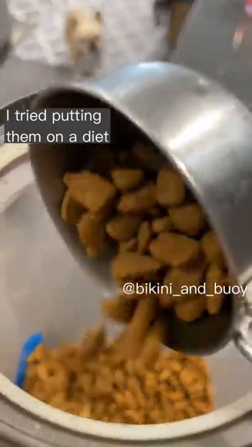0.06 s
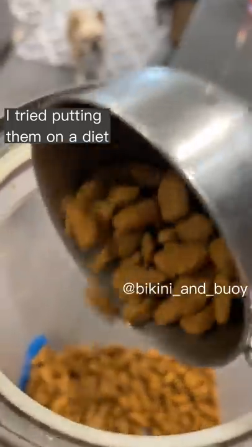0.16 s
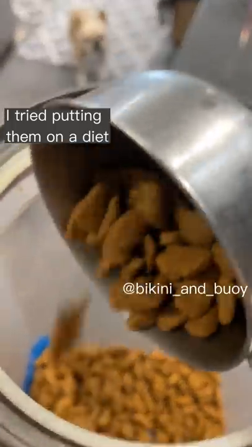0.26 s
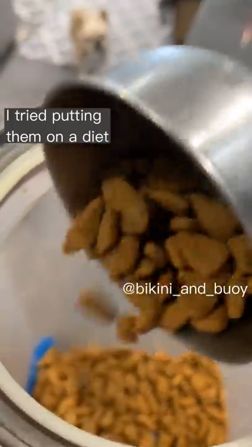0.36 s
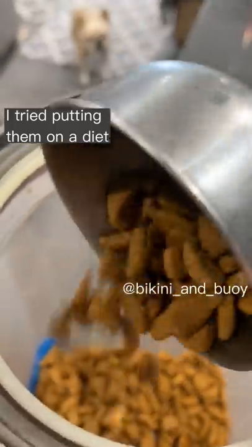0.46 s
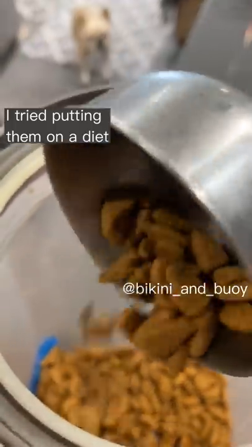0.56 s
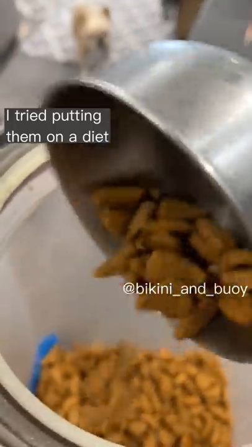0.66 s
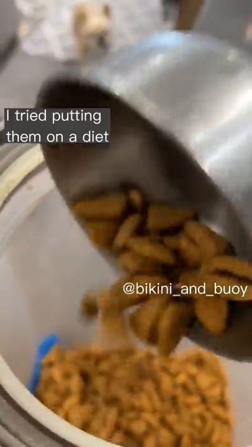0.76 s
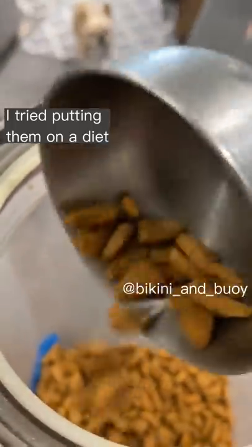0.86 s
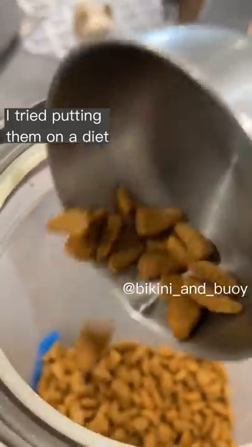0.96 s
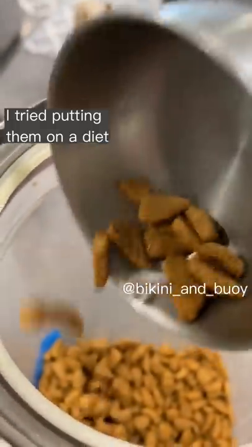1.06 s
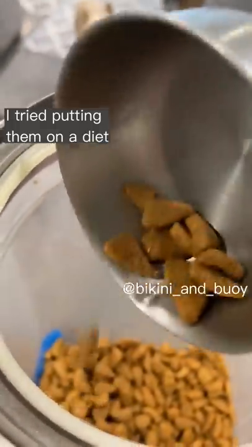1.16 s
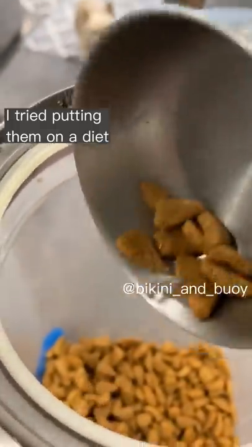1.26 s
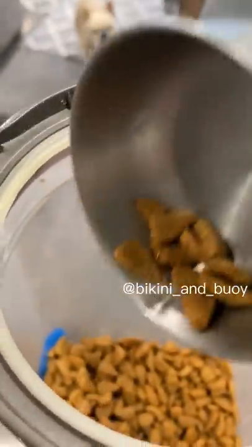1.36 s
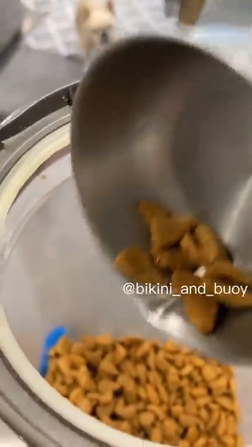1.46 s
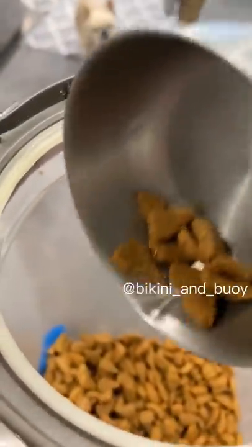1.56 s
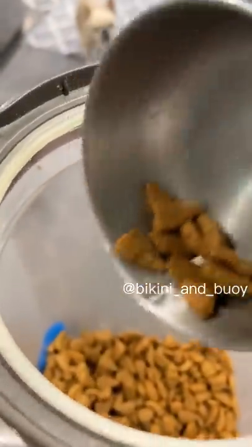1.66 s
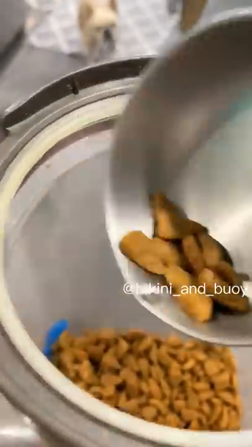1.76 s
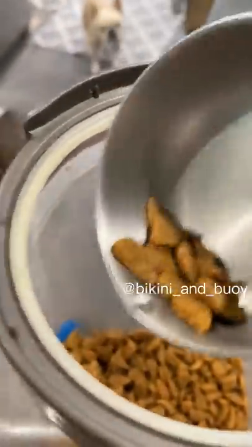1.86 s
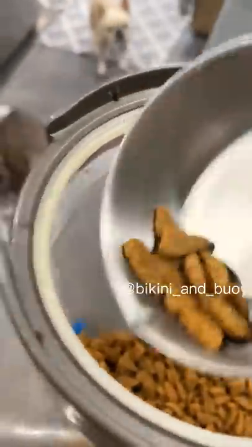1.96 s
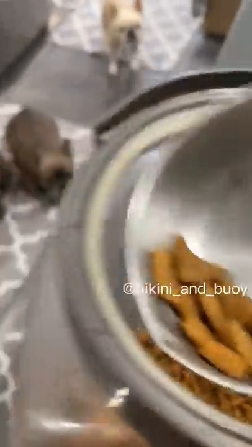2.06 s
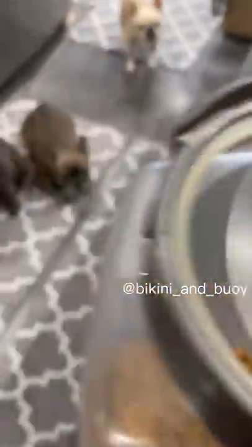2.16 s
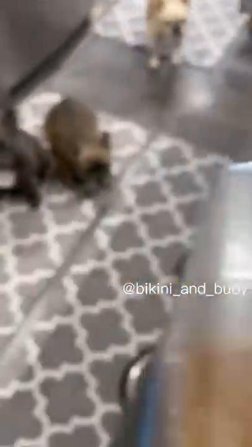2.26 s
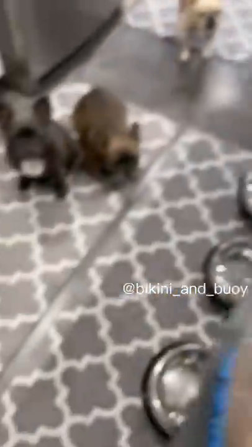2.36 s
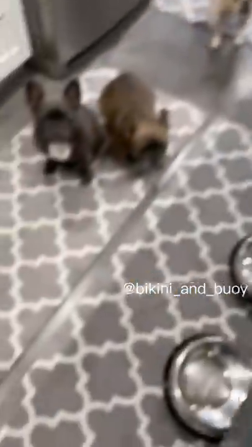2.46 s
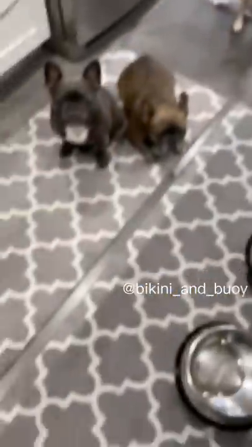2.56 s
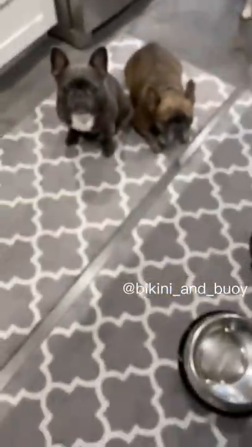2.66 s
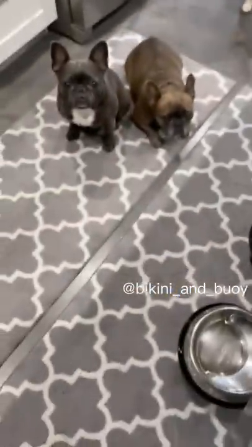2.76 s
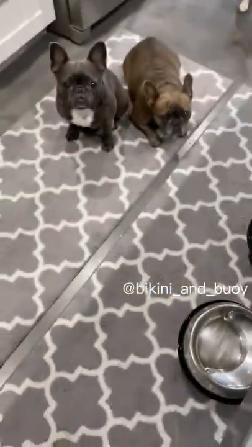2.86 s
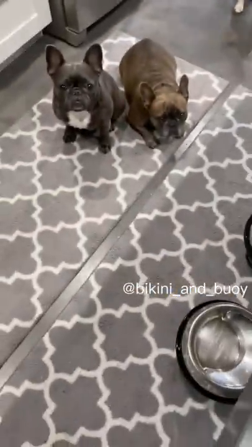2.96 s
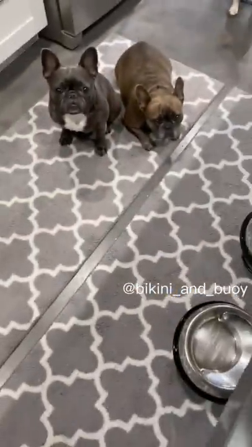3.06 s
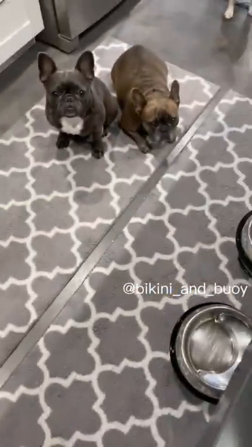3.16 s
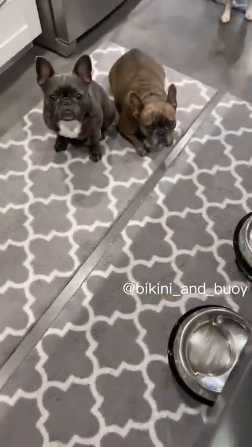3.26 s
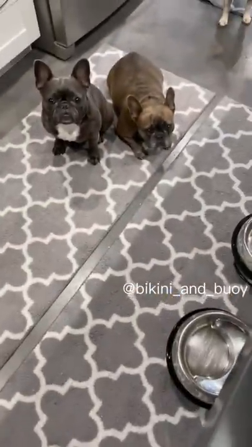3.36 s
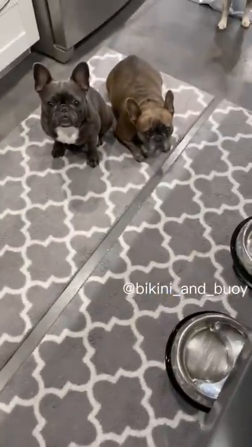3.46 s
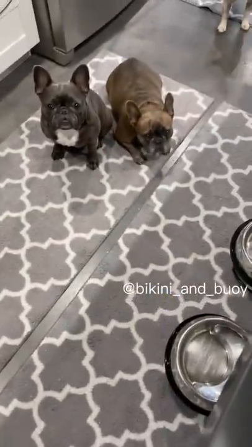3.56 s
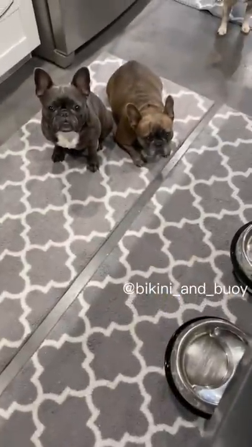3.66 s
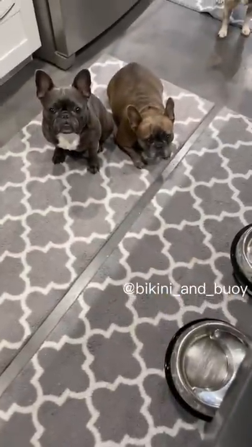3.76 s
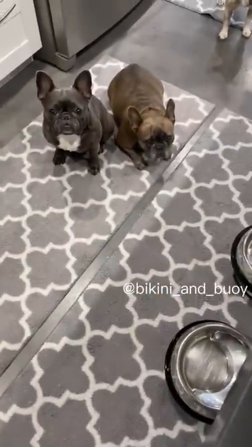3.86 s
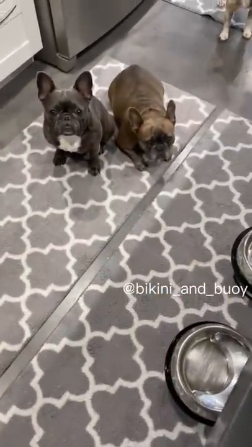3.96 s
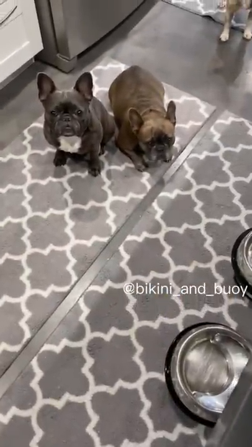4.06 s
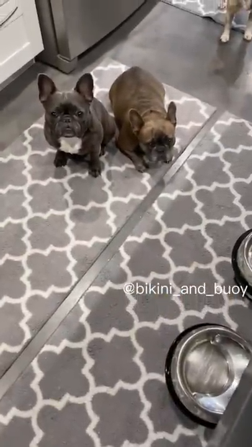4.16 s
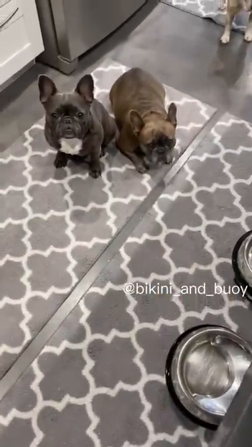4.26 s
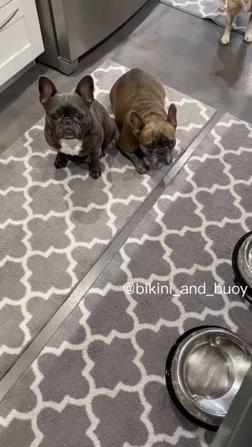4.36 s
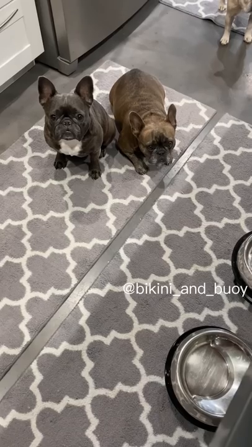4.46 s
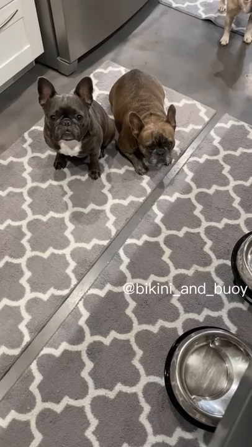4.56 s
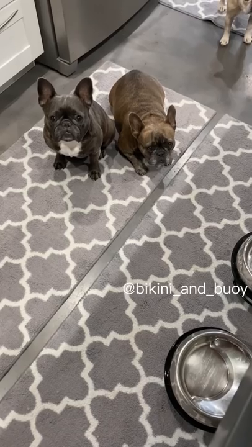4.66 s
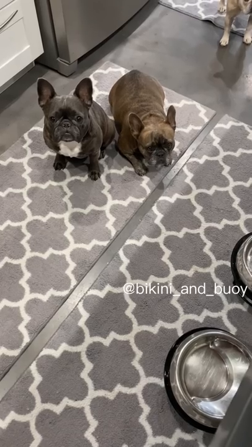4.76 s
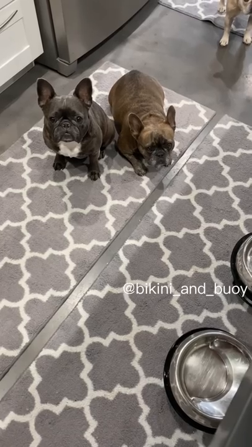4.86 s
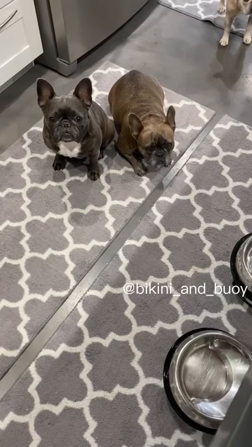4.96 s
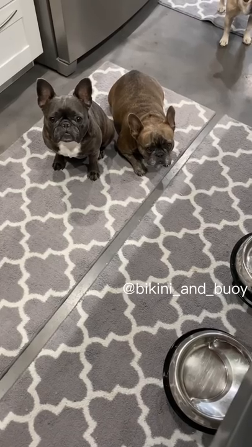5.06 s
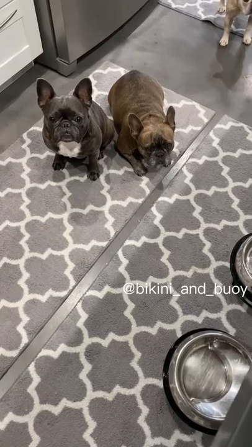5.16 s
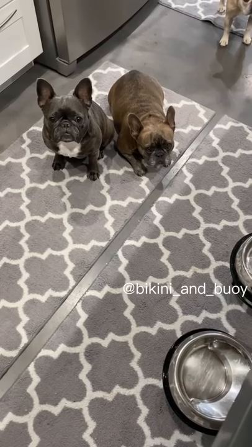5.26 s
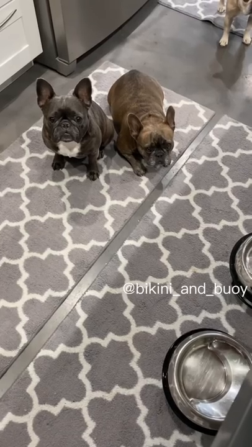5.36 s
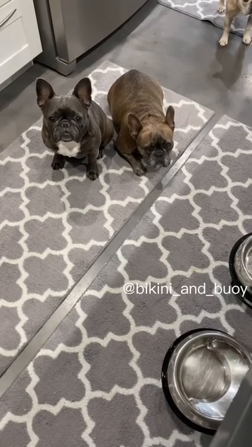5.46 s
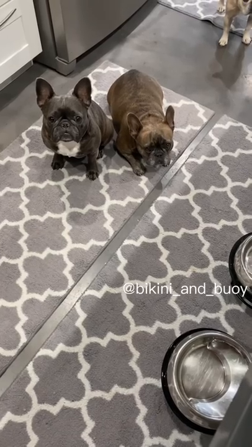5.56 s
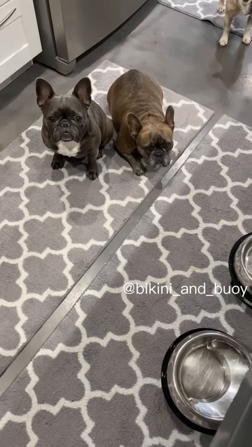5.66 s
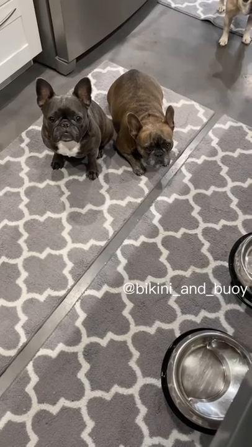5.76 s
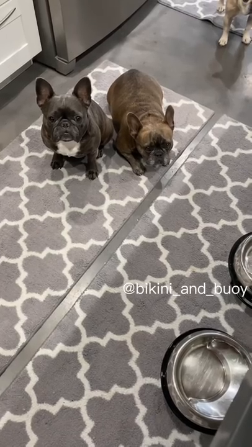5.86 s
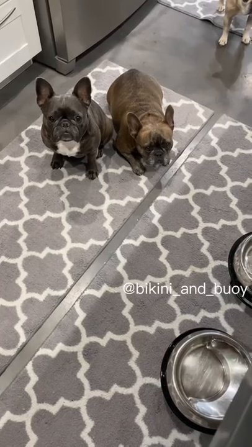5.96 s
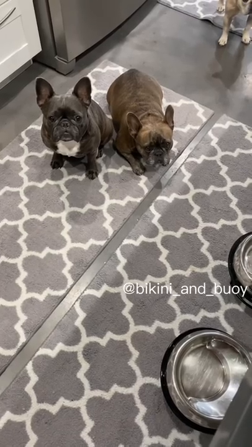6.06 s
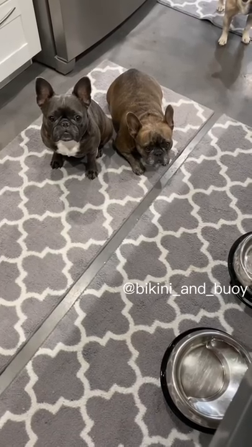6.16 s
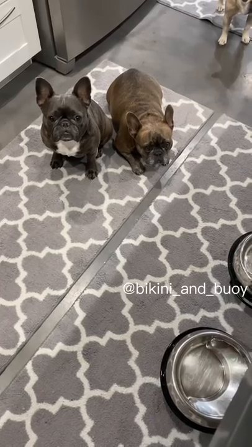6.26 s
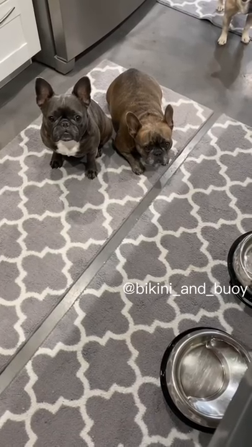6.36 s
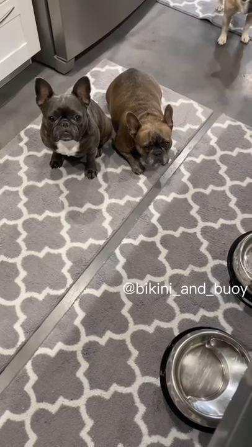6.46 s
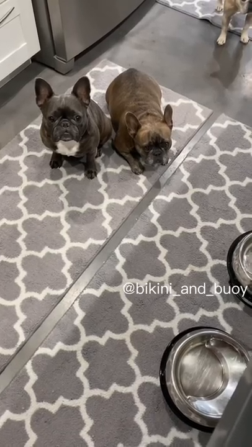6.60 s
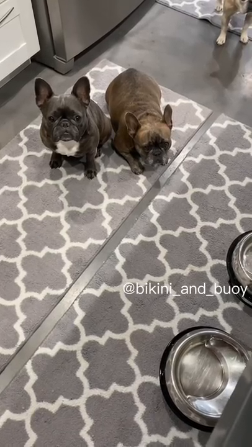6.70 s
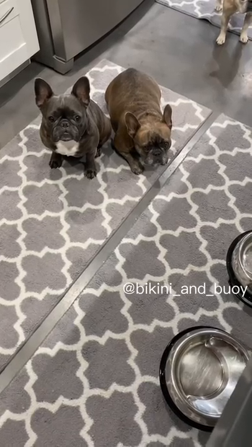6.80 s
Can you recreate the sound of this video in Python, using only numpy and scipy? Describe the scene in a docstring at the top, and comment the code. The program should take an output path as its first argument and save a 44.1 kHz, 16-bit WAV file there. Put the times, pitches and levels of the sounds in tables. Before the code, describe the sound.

A close, dense rattle of pet food lands on a pile in a hollow bin, then thin scoop ringing, a click and late thuds.

```python
"""Big dry kibble tips from a steel scoop into a deep storage bin, heard close by in a kitchen.
Each landing is an impact: noise grains crunch on the pile and decaying modes of air, floor and walls boom.
Pieces left in the scoop slide and jolt, and this friction noise drives the modes of its thin steel.
A lone click and, later, dull knocks on the bin follow; fine crumbs trickle during the pour.
A filtered-noise room tail answers these sounds, over a quiet hum with a smooth hiss."""
import sys
import numpy as np
from scipy import signal
from scipy.fft import rfft, irfft, next_fast_len
from scipy.io import wavfile
from scipy.ndimage import uniform_filter1d

SR = 44100
rng = np.random.default_rng(int(sys.argv[2]) if len(sys.argv) > 2 else 0)


def materialize(psi):
    """Save the field psi as 16-bit PCM at rate SR to the path in sys.argv[1].

    A 1-D psi becomes a single channel; in a 2-D psi each row is a channel.
    """
    bounded = np.clip(np.atleast_2d(psi).T, -1, 1)
    quanta = np.round(bounded * 32767).astype(np.int16)
    wavfile.write(sys.argv[1], SR, quanta)


N = 301203


def undb(db):
    """Logarithmic levels: the amplitude gain of a dB value."""
    return 10 ** (np.asarray(db) / 20)


def unit(x):
    """Normalisation: scale a signal to an rms of 1."""
    return x / np.sqrt(np.mean(x ** 2))


def filtered(x, order, hz, kind="low"):
    """Linear filtering: a Butterworth low-pass, high-pass or band-pass."""
    return signal.sosfilt(signal.butter(order, hz, kind, fs=SR, output="sos"), x)


def held(count, spread_db):
    """Random modulation: normally scattered dB gains, each held for count samples."""
    steps = rng.standard_normal(N // count + 1)
    return undb(spread_db * np.repeat(steps, count)[:N])


def curve(table, column):
    """Linear interpolation: a table column joined up in time."""
    points = np.array(table)
    return np.interp(np.arange(N) / SR, points[:, 0], points[:, column])


def colour(x, spectrum):
    """Spectral shaping: weight x by (frequency [Hz], level [dB]) points joined on a log axis."""
    hz, db = np.transpose(spectrum)
    size = next_fast_len(len(x))
    f = np.maximum(np.fft.rfftfreq(size, 1 / SR), 1)
    gain = undb(np.interp(np.log(f), np.log(hz), db))
    return irfft(rfft(x, size) * gain, size)[:len(x)]


def ring(x, hz, t60):
    """Forced resonance: one exponentially decaying mode driven by x."""
    pole = np.exp(2j * np.pi * hz / SR - np.log(1000) / (t60 * SR))
    return signal.lfilter([1], [1, -pole], x).imag


def spikes(s, size):
    """Impulsive excitation: single-sample pushes of given sizes at given times."""
    x = np.zeros(N)
    np.add.at(x, np.clip((s * SR).astype(int), 0, N - 1), size)
    return x


def strike(modes, s, db, scatter_db, detune=0., in_step=False):
    """Modal excitation: each blow lands on another spot, so mode levels and pitches vary."""
    hz, gain_db, t60 = np.transpose(modes)[:, :, None]
    t = np.arange(int(t60.max() * SR)) / SR
    spot = rng.standard_normal((len(s), 2, len(modes), 1))
    out = np.zeros(N + len(t))
    sign = 1 if in_step else -1  # neighbouring modes start in the same or in opposite directions
    starts = np.clip((s * SR).astype(int), 0, N)
    for at, level_db, (wake, pitch) in zip(starts, db, spot):
        fading = undb(level_db + gain_db + scatter_db * wake) * 1000 ** (-t / t60)
        rings = fading * np.sin(2 * np.pi * hz * (1 + detune * pitch) * t)
        out[at:at + len(t)] += rings[::2].sum(0) + sign * rings[1::2].sum(0)
    return out[:N]


def crunch(s, db, spectrum, spread_ms, sharp_ms, tail_ms, tail_db, count=4):
    """Granular fracture: crumbly surfaces grind in clusters of short noise grains with a softer trail."""
    chance = rng.random((len(s), 2, count))
    after = np.reshape(spread_ms, (-1, 1)) / 1000 * chance[:, 0] * np.arange(count) / count
    weaker_db = -14 * chance[:, 1] * np.sign(np.arange(count))  # the first grain keeps its full level
    push = spikes((s[:, None] + after).ravel(), undb(db[:, None] + weaker_db).ravel())

    def fade(ms):
        return signal.lfilter([1], [1, -np.exp(-1000 / (ms * SR))], push)

    def drift(spread_db):
        return uniform_filter1d(held(count=500, spread_db=spread_db), size=500)

    shape = uniform_filter1d(fade(sharp_ms) + undb(tail_db) * fade(tail_ms), size=64)
    grit = unit(colour(rng.standard_normal(N), spectrum))
    # the duller and brighter parts vary separately
    dull = filtered(grit, 2, 4500)
    return (dull * drift(spread_db=-0.5) + (grit - dull) * drift(spread_db=2.5)) * shape


# spectrum of the room noise: (frequency [Hz], relative density [dB per Hz])
HUM = [(15, -43), (30, -7), (92, -4.5), (141, -9), (225, -4), (250, -14.5), (325, -13), (469, -22),
       (791, -34.5), (1410, -46.5), (4220, -57.5), (13000, -60.5)]
HUM_DB = -57.5
HUM_PAN_DB = 1.5  # left minus right


def hum():
    """Partly coherent noise: a wavering rumble under a smooth hiss; the sides differ above the bass."""
    steps = np.repeat(rng.standard_normal(N // 3000 + 1), 3000)[:N]
    waver = undb(2.0 * uniform_filter1d(steps, 3000))
    both, left, right = (colour(rng.standard_normal(N), HUM) for _ in range(3))
    apart = np.array([colour(side, [(120, -29.0), (600, 9.0)]) for side in (left, right)])
    steady = filtered(unit(both + 0.8 * apart), 2, 11000)
    bass = signal.sosfiltfilt(signal.butter(1, 900, fs=SR, output="sos"), steady)
    side_db = HUM_DB + HUM_PAN_DB * np.array([[.5], [-.5]])
    return undb(side_db) * (waver * bass + steady - bass)


# decay of the room tail by band: (centre frequency [Hz], reverberation time t60 [s])
ROOM_T60 = [(100, 0.16), (400, 0.29), (1500, 0.097), (4000, 0.19), (10000, 0.063)]
ROOM_DB = -14


def room(x):
    """Diffuse reverberation: noise bands die at their own rates, unrelated left and right above the bass."""
    t = np.arange(SR // 2) / SR
    tail = 0
    for hz, t60 in ROOM_T60:
        band = filtered(rng.standard_normal((2, len(t))), 1, [hz / 2, min(hz * 1.7, 10000)], "band")
        tail = tail + band * 1000 ** (-t / t60) * np.minimum(t / 0.0075, 1)
    # long waves reach both sides alike
    middle = tail.mean(0)
    tail = middle + filtered(tail - middle, 2, 450, "high")
    tail = filtered(tail, 4, 11000)
    tail = tail / np.sqrt(np.sum(tail ** 2) / 2)
    return undb(ROOM_DB) * signal.fftconvolve(x[None], tail, axes=1)[:, :N]


# spectrum of crunching pieces, for crumbs, rattle and blows: (frequency [Hz], relative level [dB])
CRUNCH = [(1500, -4.5), (3000, -3.5), (4500, -2), (6000, -3), (9000, -4.5), (11500, -3), (16000, -20.5)]
CRUMBS_DB, CRUMBS_UNTIL_S, CRUMBS_FADE_DB_S = -68, 1.36, 96  # level (dB), fade start (s), fade (dB per s)


def crumbs():
    """Granular flow: unevenly gated noise of fine crumbs trickling between the pieces, then settling."""
    late = np.maximum(np.arange(N) / SR - CRUMBS_UNTIL_S, 0)
    trickle = rng.standard_normal(N) * held(count=60, spread_db=5.5) * held(count=900, spread_db=1.0)
    soft = filtered(unit(colour(trickle, CRUNCH)), 4, 9800)
    return undb(CRUMBS_DB - CRUMBS_FADE_DB_S * late) * soft


SNAP_S, SNAP_DB = 1.9886, -22  # time (s), level (dB)


def snap():
    """Broadband transient: one dry, bright click of noise with a fast and a slower decay."""
    t = np.arange(N) / SR - SNAP_S
    shape = (t > 0) * (np.exp(-np.abs(t) / 0.00051) + 0.43 * np.exp(-np.abs(t) / 0.0032))
    return undb(SNAP_DB) * filtered(rng.choice([-1., 1.], N) * shape, 1, 2500, "high")


# pieces sliding in the scoop: (start [s], length [s], low ring drive [dB], upper rings drive [dB])
SLIDES = [(0.235, 0.16, -51, -56.5), (1.245, 0.27, -66, -70), (1.886, 0.058, -50.5, -55.5),
          (2.11, 0.086, -71, -71), (2.64, 0.12, -58, -64.5), (3.051, 0.54, -65.5, -73.5),
          (3.875, 0.342, -72.5, -89.5), (4.573, 0.1, -70.5, -88.5), (4.89, 0.13, -72.5, -89.5),
          (6.816, 0.057, -57.5, -63)]
# pieces jolting against the scoop: (time [s], upper rings drive [dB], low ring level [dB])
TICKS = [(0.24, -42, -44), (0.271, -44, -42.5), (0.359, -46.5, -44), (0.39, -37, -43.5),
         (0.767, -49.5, -41), (1.4583, -58.5, -47), (1.509, -51, -52), (1.557, -68, -52.5),
         (1.8977, -47, -53), (2.61, -69.5, -71), (2.671, -64, -52.5), (2.6958, -51.5, -54.5),
         (3.0773, -51, -61), (3.176, -60.5, -59.5), (3.284, -63.5, -68), (3.3968, -72, -52.5),
         (3.505, -60, -53), (3.532, -52, -54), (3.986, -67, -68), (4.224, -68, -78), (5.029, -48, -57)]
SLIDE_RISE_S, SLIDE_FALL_S = 0.01, 0.021
JOLT_S = 0.0048  # a jolt swells for this long, then dies


def contact():
    """Friction envelopes for low and upper rings: slides rise, hold and fall; jolts are short bursts."""
    t = np.arange(N) / SR
    start, length, low_db, upper_db = np.transpose(SLIDES)[:, :, None]
    rise = (t - start) / SLIDE_RISE_S
    fall = (start + length - t) / SLIDE_FALL_S
    on = np.clip(np.minimum(rise, fall) + 1, 0, 1) ** 2
    s, jolt_db, _ = np.transpose(TICKS)
    swell = t[:SR // 10] / JOLT_S
    jolts = signal.fftconvolve(spikes(s, undb(jolt_db)), swell * np.exp(1 - swell))[:N]
    chatter = uniform_filter1d(held(count=1300, spread_db=2.5), size=300)  # the pieces catch and slip
    low = np.sum(on * undb(low_db), 0)
    upper = chatter * np.sum(on * undb(upper_db), 0) + jolts
    return low, upper


# modes of the scoop: (frequency [Hz], level [dB], decay time t60 [s])
SCOOP = [(1320, -1, 0.28), (2640, -9.5, 0.11), (3555, -21.5, 0.05), (4240, -21, 0.22), (4550, -4, 0.14),
         (5700, -16, 0.11), (6230, -24, 0.29), (6529, -13.5, 0.22), (6890, -16, .15), (6670, -19, 0.1),
         (8760, -19, 0.13), (9400, -16.5, 0.09), (9930, -26, .14), (12400, -17, .08)]
# rings that the hand damps or frees: (row numbers in the mode table)
GRIPPED = (1, 3, 4, 5, 6, 7, 8, 9)
# grip changes: (first [s], second [s])
REGRIP_S = (1.1, 3.75)
# gain of each gripped ring before the first change: (one gain [dB] per ring)
TIPPING_DB = (-2.5, 3.5, -8, 6.5, 14.5, 4, 2, -2.5)
# gain of each gripped ring after the second change: (one gain [dB] per ring)
RESTING_DB = (-1, 7, -11, 11.5, -18, -13, -22, 9)
# dry scrape, loudest where many rings of the steel crowd: (centre [Hz], width [Hz], level [dB])
RASP = [(2400, 2700, -4), (4430, 1300, 3.5), (5260, 400, -6), (6800, 310, -1.5), (9310, 1700, -1),
        (12400, 900, 1.5)]


def scoop():
    """Friction-driven modes: rough contact feeds the steel unevenly, and jolts also strike the low ring."""
    t = np.arange(N) / SR
    low, upper = contact()
    rough = unit(rng.standard_normal(N) * held(count=150, spread_db=2.5))
    rings = 0
    for k, (hz, db, t60) in enumerate(SCOOP):
        drive = upper * held(count=800, spread_db=4.5) if k else low
        if k in GRIPPED:
            j = GRIPPED.index(k)
            grip_db = TIPPING_DB[j] * (t < REGRIP_S[0]) + RESTING_DB[j] * (t > REGRIP_S[1])
            drive = drive * undb(grip_db)
        # each mode feels other grains; the factor keeps its level independent of its decay time
        even = np.sqrt(4 * np.log(1000) / (t60 * SR))
        rings = rings + undb(db) * ring(drive * np.roll(rough, 1000 * k), hz, t60) * even
    scrape = 0
    for hz, width, db in RASP:
        band = ring(ring(rough, hz, 2 / width), hz, 2 / width)
        scrape = scrape + undb(db) * band * np.sqrt(width ** 3)
    rasp = undb(-7.5) * upper * unit(scrape)
    s, _, low_db = np.transpose(TICKS)
    return rings + rasp + strike(SCOOP[:1], s, low_db, 0.)


# modes of the air column: (frequency [Hz], relative level [dB], decay time t60 [s])
AIR = [(96.6, -1.5, 0.34), (137.2, -10.5, 0.36)]
# modes of the floor drum: (frequency [Hz], relative level [dB], decay time t60 [s])
DRUM = [(307.6, -4, 0.11), (334, 5.5, 0.095), (356, 0, 0.053)]
# modes of the walls: (frequency [Hz], relative level [dB], decay time t60 [s])
WALL = [(593, -10.5, 0.0043), (776.6, -8.5, 0.046), (895, 0.5, 0.044), (1060, 5.5, 0.013),
        (1519, -5, 0.031), (1693, -10.5, 0.055), (2240, -6.5, 0.0075), (3130, -8, 0.013)]
SPOT_DB, DETUNE = 2.5, .03  # spread of drum and wall modes between blows (dB, share of pitch)


def bin_body(s, air_db, drum_db, wall_db, late_ms):
    """Coupled modes: walls knock just after the touch, drum and air later; blunt contact dulls them."""
    late = s + late_ms / 1000
    air = strike(AIR, late, air_db, 0.89)
    drum = strike(DRUM, late, drum_db - 5.0, SPOT_DB, DETUNE, in_step=True)
    lows = air + filtered(drum, 2, 230, "high")
    walls = strike(WALL, s + .0012, wall_db, SPOT_DB, DETUNE)
    return filtered(lows, 2, [55, 510], "band") + filtered(walls, 2, [300, 6900], "band")


# heavier, duller knocks: (time [s], crack [dB], air boom [dB], drum before trim [dB], wall knock [dB])
KNOCKS = [(5.5661, -41, -34.5, -30.5, -27), (5.8018, -25, -23.5, -17, -15),
          (5.9152, -28.5, -26, -27.5, -41.5), (5.942, -55, -29.5, -35.5, -36),
          (6.032, -43.5, -55, -40.5, -46.5), (6.1981, -21.5, -25, -20.5, -15.5),
          (6.2402, -48.5, -66, -37, -48)]
# spectrum of a dull crack, for knocks and blows: (frequency [Hz], relative level [dB])
CRACK = [(500, 13), (1500, -3), (2500, -11.5), (4000, -3), (6000, -7), (9000, -14.5), (14000, -34)]


def knocks():
    """Impact and resonance: knocks crack dully, rumble on and set the lowest ring of the scoop going."""
    s, crack_db, air_db, drum_db, wall_db = np.transpose(KNOCKS)
    body = bin_body(s, air_db, drum_db, wall_db, 13.0)
    # the hollow bin keeps the duller part of the crack going
    rumble = filtered(crunch(s + 0.00066, wall_db - 31.5, CRACK, 33.0, 18.0, 98.0, -4.1), 3, 4600)
    crack = crunch(s, crack_db, CRACK, 5.2, 1.0, 2.2, -33.0)
    return body + crack + rumble + strike(SCOOP[:1], s, wall_db - 21.5, 1.5)


# small pieces jostling on the pile between the blows: (time [s], level before part trims [dB])
RATTLE = [(0.0, -36.5), (0.86, -47.5), (1.25, -54), (1.5, -77)]
POUR_END_S = RATTLE[-1][0]


def rattle(count=260):
    """Stochastic impacts: many small knocks at random times on the pile while the pour lasts."""
    when, size = rng.random((count, 2)).T
    s = when * POUR_END_S
    db = curve(RATTLE, 1)[(s * SR).astype(int)] - 2.5 * np.log(1 - size)  # few knocks are much louder
    body = bin_body(s, db - 5.0, db - 10.5, db - 14.0, 2.4)
    return body + crunch(s, db - 22.0, CRUNCH, 8.9, 0.36, 1.8, -18.0)


# pieces landing in the bin, and light bumps against it:
# (time [s], crunch [dB], air boom [dB], thud before trim [dB], wall knock [dB])
BLOWS = [(0.0024, -37, -27.5, -32, -33), (0.0223, -35.5, -36, -37.5, -32.5), (0.057, -34.5, -45, -43, -44),
         (0.0665, -33, -34, -31.5, -33), (0.1061, -41, -26, -30, -22), (0.1445, -41.5, -27.5, -36, -36.5),
         (0.177, -32.5, -34, -29, -29.5), (0.195, -22.5, -21, -18, -15), (0.27, -34, -30.5, -38.5, -34.5),
         (0.2895, -37, -45, -26, -28.5), (0.337, -37.5, -41, -45, -48), (0.346, -36, -29.5, -28.5, -24),
         (0.4119, -38, -35, -36.5, -38), (0.4691, -35.5, -50, -35, -34), (0.5242, -40.5, -39, -21.5, -23.5),
         (0.5353, -30.5, -39, -34, -34), (0.5591, -32, -31.5, -44, -36), (0.5785, -32.5, -37.5, -30.5, -32),
         (0.6004, -32, -38, -35.5, -31.5), (0.647, -33.5, -34, -36.5, -37),
         (0.6815, -30.5, -41, -34, -36.5), (0.696, -37, -46, -36.5, -33.5),
         (0.7336, -32.5, -47.5, -35, -33.5), (0.7712, -37, -53.5, -52.5, -53),
         (0.808, -43.5, -49.5, -41.5, -46), (0.831, -46.5, -51, -39, -46.5),
         (0.849, -30.5, -51.5, -22.5, -32.5), (0.861, -36.5, -32, -34, -43.5),
         (0.868, -35.5, -44.5, -42.5, -29.5), (0.892, -39, -41.5, -32, -38.5),
         (0.906, -33.5, -46.5, -41.5, -37.5), (0.919, -34, -48, -36.5, -41),
         (0.971, -27, -47, -33.5, -26.5), (0.9947, -31.5, -42.5, -41.5, -34.5),
         (1.057, -30.5, -33, -35, -30.5), (1.131, -40.5, -44, -24.5, -29.5),
         (1.1378, -28, -34.5, -13.5, -17), (1.2357, -38, -35.5, -36.5, -40),
         (2.242, -63.5, -38, -46.5, -55.5), (2.3176, -89, -44.5, -48, -65), (2.9721, -48.5, -51, -43, -47),
         (2.988, -56, -47, -39, -44.5), (4.4561, -47.5, -49.5, -44.5, -45),
         (4.467, -46.5, -46.5, -42.5, -44.5)]
CLUMP_MS, SINGLE_MS = 20, 16  # how long one landing crumbles, in the pour and after it


def blows():
    """Impact on a granular bed: landings crunch brightly; harder wall knocks add more of a dull crack."""
    s, crunch_db, air_db, thud_db, wall_db = np.transpose(BLOWS)
    spread_ms = np.where(s < POUR_END_S, CLUMP_MS, SINGLE_MS)
    crack = crunch(s, wall_db - 13.0, CRACK, 5.0, 2.2, 8.0, -23.5)
    body = bin_body(s, air_db, thud_db, wall_db, 4.0)
    return body + crack + crunch(s, crunch_db, CRUNCH, spread_ms, 1.93, 8.7, -32.5)


def scene():
    """Superposition: bin, scoop, crumbs and click with their room tail, over the hum."""
    near = snap() + blows() + knocks() + rattle() + crumbs() + scoop()
    return near + room(near) + hum()


# phase between the two ports: (frequency [Hz], lead of the left port [rad])
LEAD = [(0, 0), (480, -.7), (900, -1.7), (1150, -4.2), (1400, -5.7), (2100, -6), (2700, -3.7), (4000, -5),
        (5100, -1.3), (5700, .5), (12000, 2.6)]
# level between the two ports: (frequency [Hz], left minus right [dB])
TILT = [(400, 0), (950, -7), (1500, -1), (2400, 1), (4500, -3), (5500, 0)]
TOP_HZ = 16500


def record(dry):
    """Interaural-style cues: two ports differ in phase and level by pitch; lowest bass and top are cut."""
    size = next_fast_len(N)
    f = np.fft.rfftfreq(size, 1 / SR)
    lead = np.interp(f, *np.transpose(LEAD))
    hz, db = np.transpose(TILT)
    tilt_db = np.interp(np.log(f + 1), np.log(hz), db)
    # each port takes half of the difference
    half = undb(tilt_db / 2) * np.exp(.5j * lead)
    ports = irfft(rfft(dry, size) * np.array([half, 1 / half]), size)[:, :N]
    ports = filtered(ports, 2, 45, "high")
    return signal.sosfilt(signal.ellip(10, .2, 80, TOP_HZ, fs=SR, output="sos"), ports)


dry = scene()
out = record(dry)
materialize(out)
```